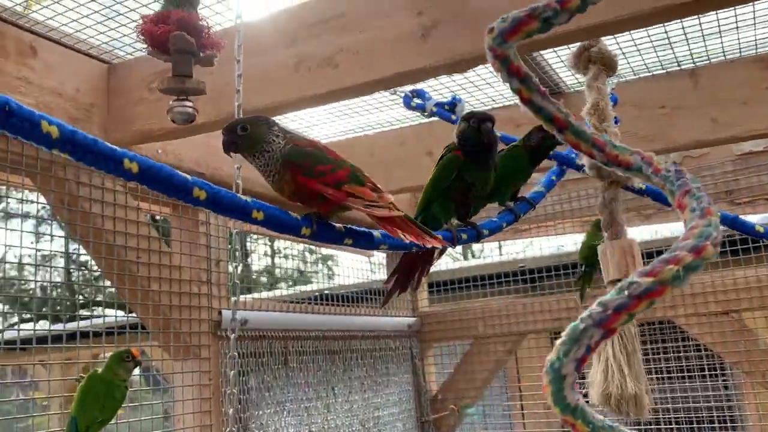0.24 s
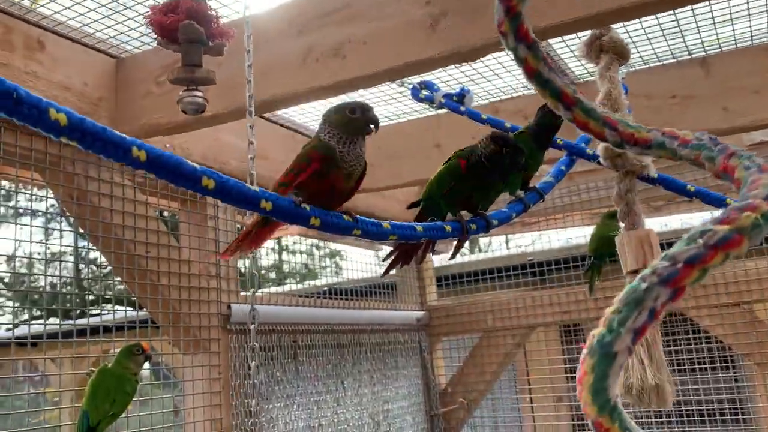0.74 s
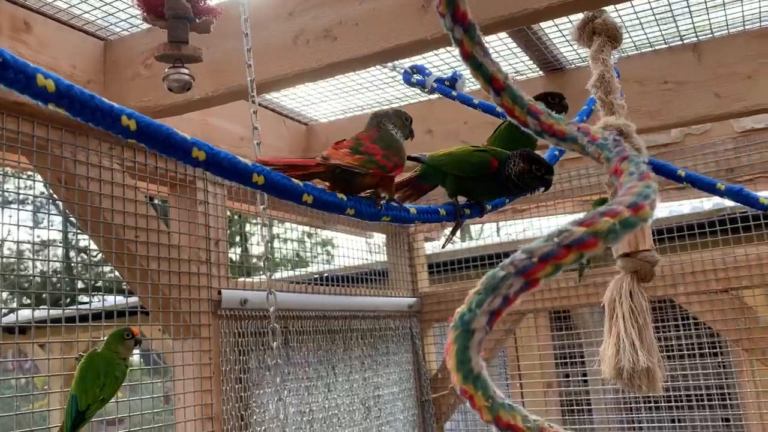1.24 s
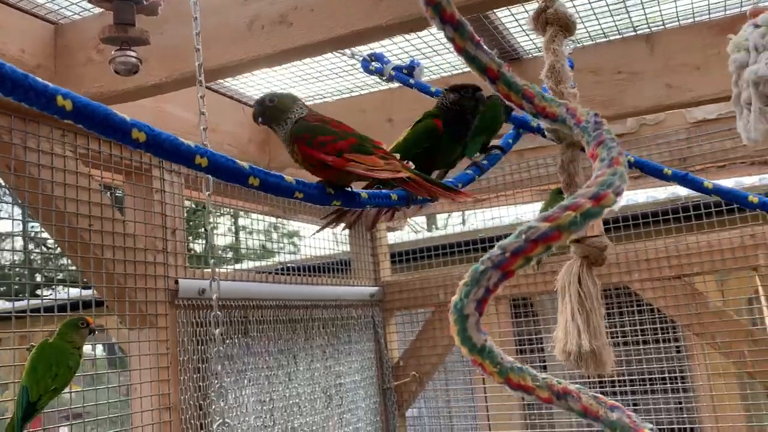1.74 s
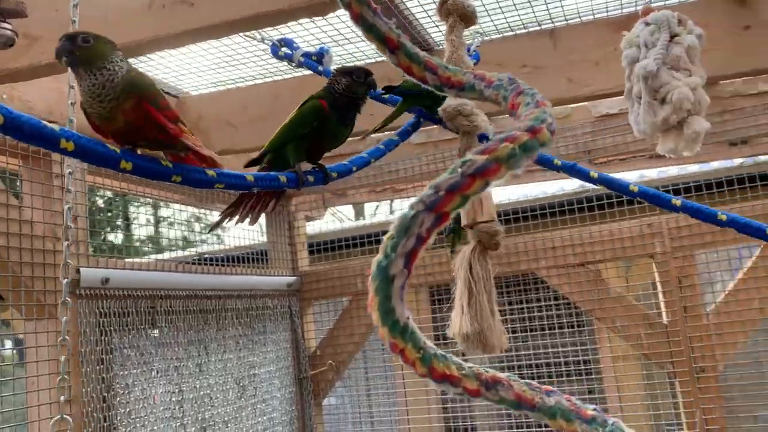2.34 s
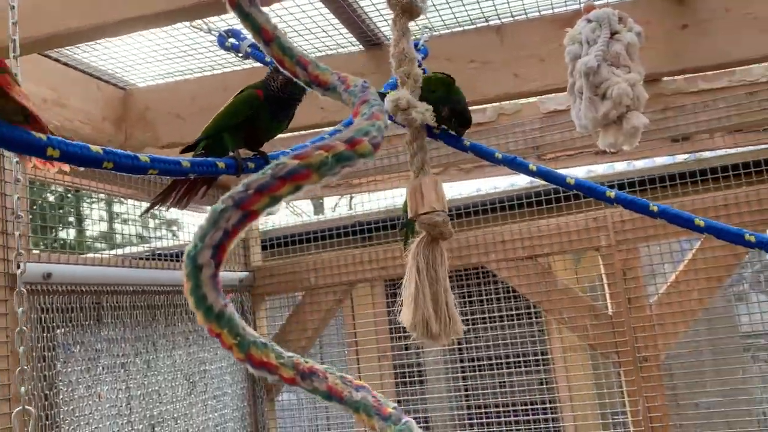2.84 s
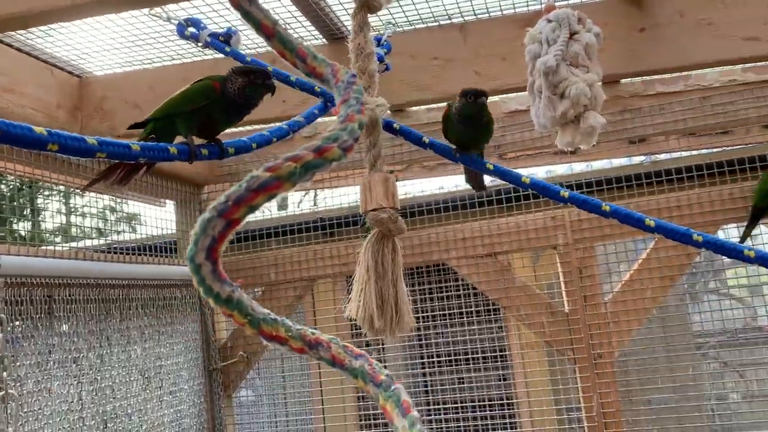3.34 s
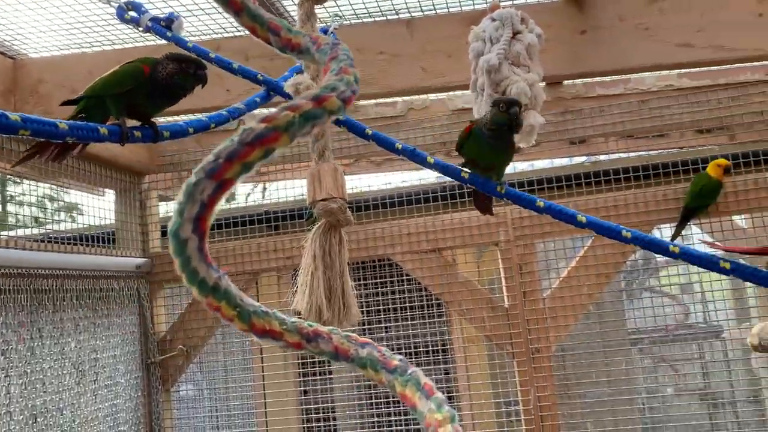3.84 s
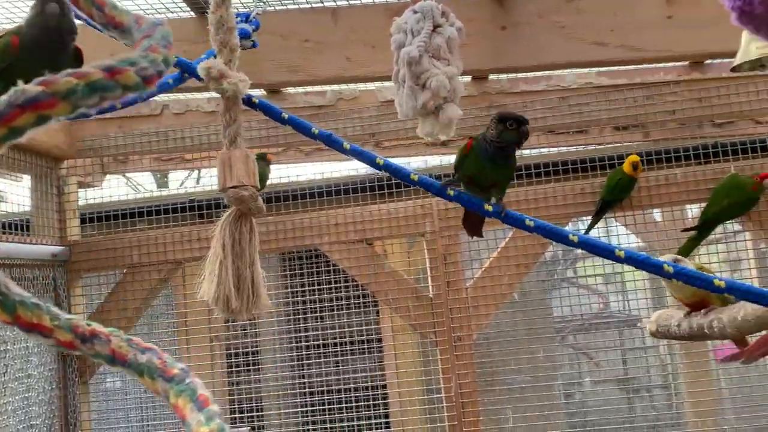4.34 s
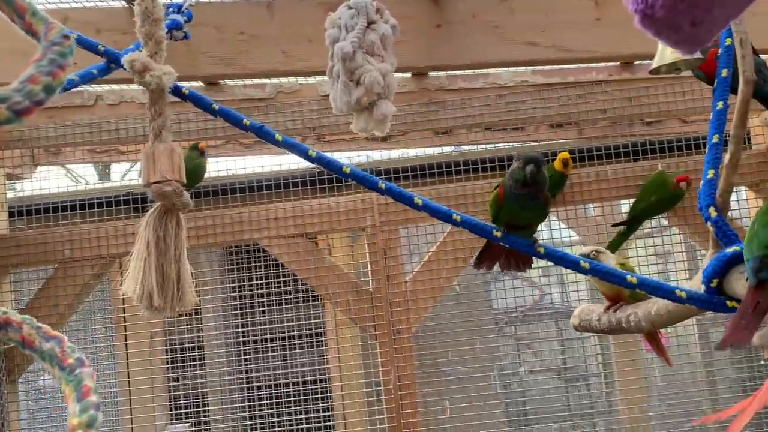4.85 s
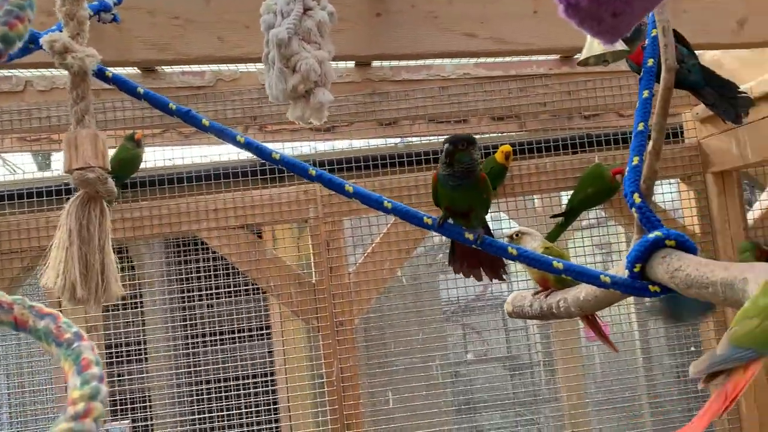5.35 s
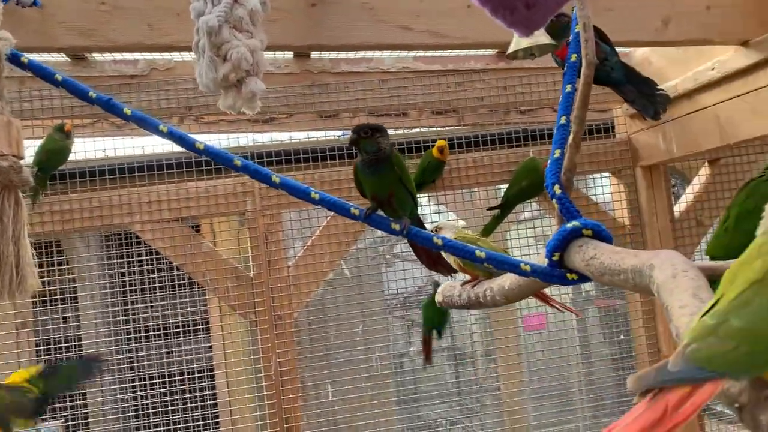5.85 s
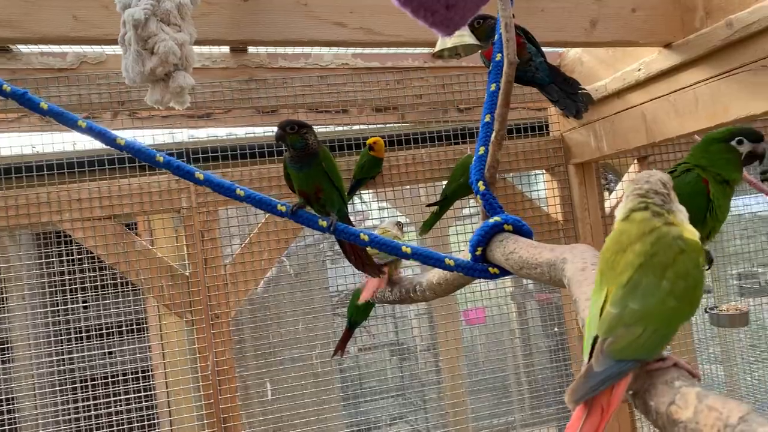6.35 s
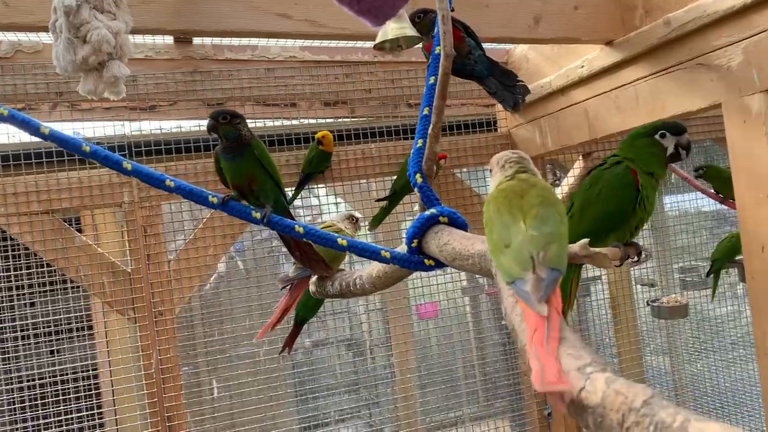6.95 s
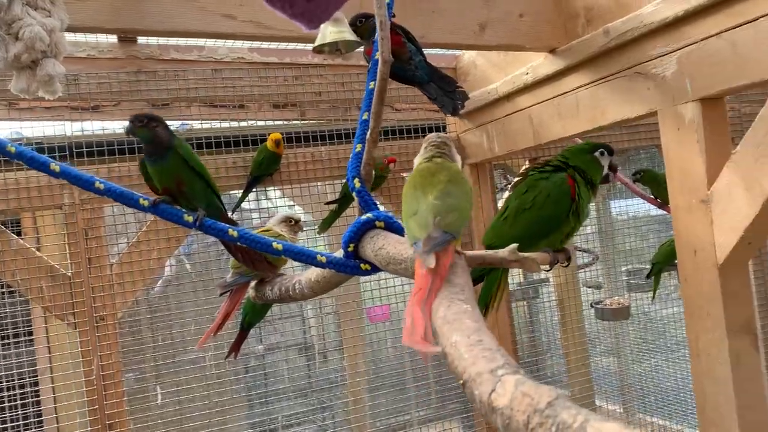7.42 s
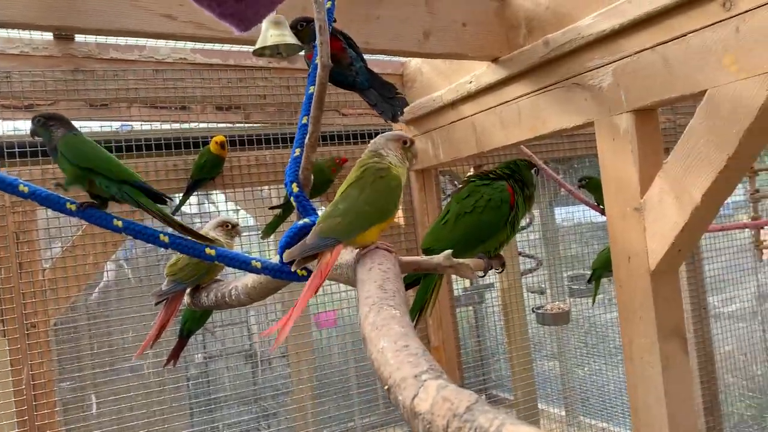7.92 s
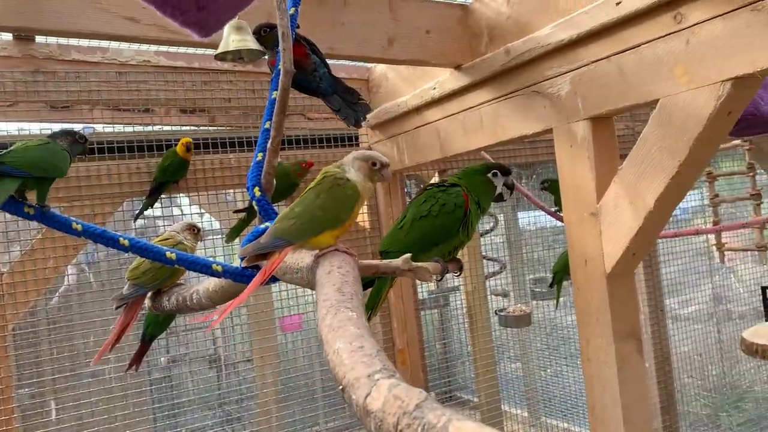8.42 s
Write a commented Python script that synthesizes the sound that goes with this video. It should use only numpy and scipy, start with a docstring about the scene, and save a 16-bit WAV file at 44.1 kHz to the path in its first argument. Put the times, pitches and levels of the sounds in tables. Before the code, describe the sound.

Parrots squawk repeatedly in an aviary, with overlapping peeps, trills, chirps and whistles over faint outdoor air.

```python
"""Conures call in a timber and wire aviary, heard over outdoor air by two hand-held microphones.
First one bird repeats an arched squawk, the harmonic tone of its syrinx membranes; neighbours add peeps,
trills and chirps, and another answers from further off. From 3.5 to 6 s the squawks hurry, higher and
hoarser, and whistles join in. After a pause the easy squawks return, and a soft thump falls at 8 s.
Throughout, the roof and beams add short echoes."""
import sys
import numpy as np
from scipy import signal
from scipy.fft import rfft, irfft, next_fast_len
from scipy.io import wavfile

SR = 44100
rng = np.random.default_rng(int(sys.argv[2]) if len(sys.argv) > 2 else 0)


def file_out(sig):
    """Save sig as 16-bit WAV at sys.argv[1]."""
    # one column per channel
    cols = np.atleast_2d(sig).T
    # limit, then scale
    lim = np.clip(cols, -1, 1)
    pcm = np.round(lim * 32767).astype(np.int16)
    wavfile.write(sys.argv[1], SR, pcm)


N = 382788

# All levels are relative. Spectrum of steady outdoor air: (frequency [Hz], level [dB])
AIR_SPECTRUM = [(20, -4.5), (60, -16), (150, -16), (400, -12), (1000, -18), (3000, -8.5), (6000, -21),
                (9000, -32.5), (16000, -57)]
# spectrum of the rumble of moving air: (frequency [Hz], level [dB])
RUMBLE_SPECTRUM = [(20, -20.5), (45, -3.5), (70, -2.5), (120, -10), (220, -16.5), (400, -20.5), (1000, -40)]
# swell and fade of that rumble: (time [s], level [dB])
RUMBLE_ENVELOPE = [(0.0, -76.5), (1.47, -67.5), (1.76, -61.5), (1.93, -75), (2.88, -71.5), (3.37, -64.5),
                   (3.56, -70), (3.63, -61), (3.72, -70), (4.2, -64.5), (4.69, -78.5), (5.54, -65.5),
                   (5.65, -55.5), (6.25, -77.5), (7.83, -73.5), (7.9, -73.5)]
# soft thumps: (time [s], level [dB], first pitch [Hz], last pitch [Hz], decay time [s])
THUMPS = [(0.689, -51.5, 200, 224, 0.06), (3.614, -67.5, 109.7, 70.4, 0.031),
          (8.048, -37, 252, 65.5, 0.028)]
# whistles: (time [s], duration [s], first pitch [Hz], last pitch [Hz], level [dB], beak resonance [Hz])
WHISTLES = [(4.173, 0.057, 1340, 1112, -36.5, 5600), (5.657, 0.11, 1692, 1744, -33.5, 3450),
            (6.51, 0.054, 1180, 1320, -54, 4800), (6.939, 0.092, 2795, 3700, -36, 3050),
            (7.013, 0.08, 2900, 3090, -36, 2980), (8.355, 0.22, 976, 936, -34, 6200),
            (8.388, .16, 1977, 1927, -31.5, 4150), (8.607, 0.11, 2970, 3300, -25, 2960)]
# trills: (time [s], duration [s], first pitch [Hz], last pitch [Hz], level [dB])
TRILLS = [(0.241, 0.095, 2580, 2450, -35), (1.824, 0.081, 2220, 2513, -30), (2.087, 0.2, 2460, 2142, -26.5),
          (3.079, 0.018, 2240, 2320, -25.5), (3.101, 0.029, 2230, 2290, -18.5),
          (3.443, 0.098, 1288, 1310, -33), (3.748, 0.22, 1083, 1049, -25.5),
          (3.998, 0.044, 3240, 2900, -23.5), (5.241, .14, 2264, 2095, -23.5),
          (5.574, 0.0506, 2300, 2085, -35.5), (5.791, 0.046, 2800, 3300, -25),
          (5.828, 0.063, 2265, 2190, -27.5)]
# whipping chirps: (time [s], top pitch [Hz], level [dB])
CHIRPS = [(1.705, 2120, -28), (4.453, 2340, -25.5), (4.698, 2290, -30), (7.123, 2416, -22.5),
          (7.377, 2420, -21.5)]
# peeps: (time [s], nominal pitch [Hz], level [dB])
PEEPS = [(.384, 1272, -37.5), (.675, 1272, -23.5), (1.108, 1309, -24), (1.688, 1400, -25),
         (1.894, 1272, -24), (2.278, 1271, -23), (2.694, 1304, -22), (3.142, 1302, -22), (3.669, 1286, -24),
         (4.149, 1259, -35.5), (4.309, 1313, -25), (4.669, 1314, -27), (5.384, 1275, -27.5),
         (6.21, 1315, -28.5), (6.554, 1308, -27)]
# throat response in a peep: (frequency [Hz], level [dB])
PEEP_THROAT = [(1300, -30), (2600, -5), (3900, -5), (5150, 1), (6400, -20), (7700, -7), (9000, -7),
               (10400, -13), (12800, -20.5), (15500, -30)]
# tick and short burst that open a peep: (time from onset [s], level [dB])
PEEP_ONSET = [(0, -20), (.003, -20), (.008, -36), (.011, -8), (.02, -8), (.025, -20), (.029, 0)]
# squawks of caller and answerer: (start [s], end [s], top pitch [Hz], level [dB])
SQUAWKS = [(0.026, 0.245, 791.7, -35), (0.396, 0.606, 800.3, -34.5), (0.756, 0.972, 806, -34.5),
           (1.14, 1.359, 799.5, -34.5), (1.548, 1.785, 852.6, -44.5), (1.899, 2.119, 854, -39),
           (2.232, 2.454, 909.5, -38.5), (2.671, 2.918, 867, -42.5), (2.831, 3.054, 802.3, -35.5),
           (3.044, 3.29, 845.4, -43.5), (3.195, 3.425, 829.6, -34.5), (3.551, 3.689, 973, -33),
           (3.796, 3.936, 962, -34), (4.042, 4.187, 970, -33.5), (4.292, 4.433, 975, -35),
           (4.544, 4.695, 942, -35), (4.8, 4.955, 937, -36), (5.076, 5.232, 930, -35),
           (5.342, 5.504, 926, -35), (5.621, 5.781, 908, -36), (5.893, 6.062, 893.5, -35.5),
           (6.728, 6.94, 788, -36), (6.94, 7.185, 782, -43.5), (7.092, 7.283, 797, -36),
           (7.321, 7.581, 868, -45), (7.413, 7.611, 795.6, -35.5), (7.713, 7.975, 871, -42.5),
           (7.78, 8.002, 780, -38), (8.149, 8.373, 807.4, -34.5), (8.514, 8.729, 806, -33)]
# throat response in an easy squawk: (frequency [Hz], level [dB])
EASY_THROAT = [(250, -64), (450, -6.5), (800, -14), (1150, -6.5), (1600, 1.5), (2400, -0.5), (3200, 2.5),
               (4000, -6), (4900, -0.5), (5700, -9.5), (6600, -5), (7700, -9), (11000, -20.5),
               (15500, -31.5)]
# the same throat strained for a high, hurried squawk: (frequency [Hz], level [dB])
STRAINED_THROAT = [(250, -50), (450, -4), (800, -13.5), (1050, -4), (1400, -6.5), (1900, 2), (2800, -3.5),
                   (3700, 0.5), (4800, -4), (5700, -12), (6600, -1.5), (7700, -14), (11000, -21),
                   (15500, -29.5)]
# treble emphasis of the squawks: (time [s], level [dB])
SQUAWK_TREBLE = [(0, 1), (1.3, -0.5), (3.2, 4), (6.0, 7), (7.8, .5), (8.68, 5)]
# direction of the squawks as the microphones move: (time [s], left channel lag [ms])
SQUAWK_LAG = [(0, 0.44), (4.4, .43), (5.2, .28), (5.8, 0.39), (7.2, 0.35), (8.3, 0.07)]
# response of the microphones: (frequency [Hz], level [dB])
MICROPHONE_RESPONSE = [(20, -8.5), (7900, 0), (8600, -28), (9100, -13), (10000, 5.5), (12400, 4.5),
                       (13500, -18.5), (14600, 5), (16000, 5.5)]

CUTOFF_HZ, FLUTTER_HZ = 16000, 74
EASY_HZ, PUSHED_HZ, STRAINED_HZ = 780, 823, 933   # top pitch of a squawk at three degrees of effort


def from_db(db):
    """Decibels express an amplitude ratio logarithmically."""
    return 10 ** (np.asarray(db) / 20)


def unit_rms(x):
    """Division by the root mean square gives unit power."""
    return x / np.sqrt(np.mean(x ** 2) + 1e-20)


def at_hz(spectrum, hz):
    """Interpolation on a log-frequency axis gives the level in dB."""
    knots, db = np.transpose(spectrum)
    return np.interp(np.log(np.maximum(hz, 1)), np.log(knots), db)


def coloured(x, spectrum):
    """Linear filtering multiplies a sound's spectrum by a gain curve."""
    size = next_fast_len(x.shape[-1] + SR // 10)
    gain = from_db(at_hz(spectrum, np.fft.rfftfreq(size, 1 / SR)))
    return irfft(rfft(x, size) * gain, size)[..., :x.shape[-1]]


def wobble(t, rate):
    """Random modulation of spread about 1, with `rate` new values a second."""
    return 1.2 * np.interp(t * rate, np.arange(1024), rng.standard_normal(1024))


def clock(start, end):
    """Time base of a call: elapsed seconds t, and progress u from -1 to 1."""
    t = np.arange(max(int((end - start) * SR), 64)) / SR
    return t, 2 * t / t[-1] - 1


def gate(t, attack_s, release_s):
    """A trapezoidal envelope opens and closes the sound."""
    return np.clip(t / attack_s, 0, 1) * np.clip((t[-1] - t) / release_s, 0, 1)


def place(out, start, call, lag_ms):
    """Path difference: a call from one side reaches the left microphone later."""
    n = np.arange(len(call))
    first = max(int(start * SR), 0)
    left = np.interp(n - lag_ms * SR / 1000, n, call)
    pair = np.array([left, call])[:, :max(N - first, 0)]
    out[:, first:first + pair.shape[1]] += pair


def perch_lag_ms():
    """Scattered perches give scattered differences in arrival time."""
    return 0.2565 + 0.089 * rng.standard_normal()


def outdoor_air(air_db=-60.5, rumble_gain_db=8.5):
    """Steady noise is incoherent between the microphones; the rumble of moving air is largely coherent."""
    air = from_db(air_db) * unit_rms(coloured(rng.standard_normal((2, N)), AIR_SPECTRUM))
    shared_noise = rng.standard_normal(N) + 0.16 * rng.standard_normal((2, N))
    rumble = unit_rms(coloured(shared_noise, RUMBLE_SPECTRUM))
    swell_db = np.interp(np.arange(N) / SR, *np.transpose(RUMBLE_ENVELOPE))
    return air + rumble * from_db(rumble_gain_db + swell_db)


def thumps(glide_s=0.009):
    """Damped oscillation: a low sinusoid slides in pitch as it decays exponentially."""
    out = np.zeros((2, N))
    for start, level_db, first_hz, last_hz, decay_s in THUMPS:
        t, _ = clock(start, start + 0.22)
        pitch = last_hz + (first_hz - last_hz) * np.exp(-t / glide_s)
        ring = np.sin(2 * np.pi * np.cumsum(pitch) / SR) * np.exp(-t / decay_s)
        place(out, start, from_db(level_db) * ring * gate(t, 0.0028, .02), lag_ms=0)
    return out


def aviary(dry, early_db=-10, tail_db=-17, far_db=-38):
    """Reverberation: roof and beams scatter quick echoes; a duller tail leaks away through the mesh."""
    t = np.arange(SR) / SR
    def echoes(spectrum, t60):
        noise = coloured(rng.standard_normal((2, SR)), spectrum)
        decay = from_db(-60 * t / t60) * (t > .002)
        return noise * decay * np.sqrt(2 * np.log(1000) / (t60 * SR))
    bright = [(300, 17.5), (4000, 13.5), (12000, 18.5)]
    dull = [(300, 17.0), (3000, 15.0), (6000, 8), (12000, -2.0)]
    response = from_db(early_db) * echoes(bright, t60=0.083)
    response += from_db(tail_db) * echoes(dull, t60=0.28) + from_db(far_db) * echoes(dull, t60=0.6)
    return dry + signal.fftconvolve(dry, response, axes=1)[:, :N]


def syrinx(t, pitch, throat, rough, harmonics, jitter=0.04, shimmer=0.62, flicker_db=3):
    """Source and filter: the throat shapes membrane harmonics; roughness shakes period and amplitude."""
    waver = .0055 * wobble(t, 35) + (.001 + .028 * rough) * wobble(t, 170)
    pitch = pitch * (1 + waver + jitter * rough * wobble(t, 900))
    phase = 2 * np.pi * np.cumsum(pitch) / SR
    call = 0
    for k in range(1, harmonics + 1):
        level_db = throat(k * pitch) + flicker_db * wobble(t, 27.14)
        call = call + from_db(level_db) * (k * pitch < CUTOFF_HZ) * np.sin(k * phase)
    return np.sqrt(2) * call * (1 + shimmer * rough * wobble(t, 500))


def beak(centre_hz, octaves, skirt_db):
    """Cavity resonance: the open beak has one peak, of half-width `octaves`, over a weak broad skirt."""
    def response_db(hz):
        peak = 1 / (1 + (np.log2(hz / centre_hz) / octaves) ** 2)
        skirt = from_db(skirt_db) / (1 + (hz / 12000) ** 4)
        return 20 * np.log10(peak + skirt)
    return response_db


def whistles(arch=0.016):
    """Resonance favours the harmonic nearest the beak's peak in each slow, slightly arched glide."""
    out = np.zeros((2, N))
    for start, duration, first_hz, last_hz, level_db, beak_hz in WHISTLES:
        t, u = clock(start, start + duration)
        pitch = np.interp(u, [-1, 1], [first_hz, last_hz]) * (1 + arch * (.5 - u ** 2))
        call = syrinx(t, pitch, beak(beak_hz, octaves=0.11, skirt_db=-19), rough=0.092, harmonics=13)
        place(out, start, unit_rms(call * gate(t, 0.013, 0.015)) * from_db(level_db), perch_lag_ms())
    return out


def trills(swing=0.071, throb_db=5.5):
    """Frequency and amplitude modulation: one fast flutter swings the pitch and chops the note."""
    out = np.zeros((2, N))
    for start, duration, first_hz, last_hz, level_db in TRILLS:
        t, u = clock(start, start + duration)
        flutter = 2 * np.pi * FLUTTER_HZ * t + .5 * wobble(t, 38.7)
        pitch = np.interp(u, [-1, 1], [first_hz, last_hz]) * (1 + swing * np.cos(flutter))
        throat = beak(1.96 * (first_hz + last_hz) / 2, octaves=0.25, skirt_db=-11.5)   # near harmonic 2
        call = syrinx(t, pitch, throat, rough=0.2, harmonics=6)
        envelope = from_db(-throb_db * np.cos(flutter + 1.46)) * gate(t, 0.22 * t[-1], 0.13 * t[-1])
        place(out, start, unit_rms(call * envelope) * from_db(level_db), perch_lag_ms())
    return out


def chirps(rise_s=.041, fall_s=.047, drop=0.66):
    """A frequency sweep whips up to a sharp turn and back, drawing harmonics through the beak's peak."""
    out = np.zeros((2, N))
    resonance = beak(2960, octaves=.4, skirt_db=-20)
    throat = lambda hz: resonance(hz) - 12 * (hz > 7500)
    for start, top_hz, level_db in CHIRPS:
        t, _ = clock(start, start + rise_s + fall_s)
        from_turn = np.interp(t, [0, rise_s, t[-1]], [1, 0, 1])
        call = syrinx(t, top_hz * (1 - drop * from_turn ** 1.2), throat, rough=0.039, harmonics=7)
        place(out, start, unit_rms(call * gate(t, 0.024, 0.03)) * from_db(level_db), perch_lag_ms())
    return out


def peeps(duration_s=0.092, scoop=0.3, tighten_s=.021, fade_db_per_s=40):
    """Tension raises frequency: as the membranes tighten, a rough stutter scoops up to a clean note."""
    out = np.zeros((2, N))
    throat = lambda hz: at_hz(PEEP_THROAT, hz)
    for start, nominal_hz, level_db in PEEPS:
        t, _ = clock(start, start + duration_s)
        slack = np.exp(-t / tighten_s)
        pitch = nominal_hz * (1.012 - scoop * slack)
        call = syrinx(t, pitch, throat, rough=0.077 + 0.75 * slack, harmonics=12)
        stutter_db = np.interp(t, *np.transpose(PEEP_ONSET))
        envelope_db = level_db + stutter_db - fade_db_per_s * (t - t.mean()) + wobble(t, 127)
        place(out, start, call * gate(t, .001, .007) * from_db(envelope_db), lag_ms=0.17)
    return out


def squawk_arch(u, top_hz, drop=0.48):
    """Pressure lifts the pitch about an octave and lets it fall; effort rounds and delays the peak."""
    roundness = np.interp(top_hz, [EASY_HZ, PUSHED_HZ], [.1, .28])
    lean = np.interp(top_hz, [EASY_HZ, PUSHED_HZ], [-0.01573, .035])
    inner = np.clip(u, -1, 1)
    arch = 1 + lean * inner - roundness * inner ** 2 - (drop - roundness) * inner ** 6
    return top_hz * (arch - 0.798 * np.abs(u - inner))


def squawks(slack_db=-7, slack_treble_db=-4, rasp=0.2, swing=0.029, margin_s=.016):
    """Irregular vibration is heard as hoarseness; it grows with strain and at each call's slack ends."""
    out = np.zeros((2, N))
    for start, end, top_hz, level_db in SQUAWKS:
        t, u = clock(start - margin_s, end + margin_s)
        u = u * t[-1] / (end - start)   # the margins lie beyond -1 and 1
        slack = np.abs(u) ** 1.79
        strain = np.interp(top_hz, [PUSHED_HZ, STRAINED_HZ], [0, 1])
        flutter = np.sin(2 * np.pi * FLUTTER_HZ * t + wobble(t, 40.75))
        pitch = squawk_arch(u, top_hz) * (1 + swing * strain * flutter)
        rough = 0.068 + .33 * strain + 0.3 * np.minimum(slack, 1)
        treble_db = np.interp(start, *np.transpose(SQUAWK_TREBLE)) + slack_treble_db * slack
        def throat(hz):
            formants_db = (1 - strain) * at_hz(EASY_THROAT, hz) + strain * at_hz(STRAINED_THROAT, hz)
            return formants_db + treble_db * np.clip(np.log2(hz / 2800) * 2, 0, 1)
        voice = syrinx(t, pitch, throat, rough, harmonics=26)
        puffs = 1 + np.cos(2 * np.pi * np.cumsum(pitch) / SR)   # turbulence escapes once each cycle
        hiss = unit_rms(coloured(rng.standard_normal(SR // 2), EASY_THROAT))[:len(t)]
        call = voice + rasp * rough * puffs * hiss
        envelope = from_db(level_db + slack_db * slack - 0.2 * u) * gate(t, 0.027, 0.023)
        place(out, start - margin_s, call * envelope, np.interp(start, *np.transpose(SQUAWK_LAG)))
    return signal.sosfilt(signal.butter(4, 520, "high", fs=SR, output="sos"), out)


def scene():
    """Direct sound dominates near a source: the close peeps, chirps and trills are the driest calls."""
    small_beak = signal.butter(3, 1330, "high", fs=SR, output="sos")   # a poor radiator of low notes
    flock = aviary(squawks() + signal.sosfilt(small_beak, whistles()))
    trilling = from_db(1.5) * signal.sosfilt(small_beak, trills())
    neighbours = from_db(-0.5) * (peeps() + chirps() + trilling)
    close = aviary(neighbours, early_db=-15, tail_db=-24.5, far_db=-47)
    return flock + close + thumps() + outdoor_air()


def record(dry):
    """Frequency response: the microphone ports carve two treble notches, and a low-pass cuts the top."""
    low_pass = signal.ellip(8, .1, 60, CUTOFF_HZ, fs=SR, output="sos")
    return signal.sosfiltfilt(low_pass, coloured(dry, MICROPHONE_RESPONSE))


dry = scene()
out = record(dry)
file_out(out)
```